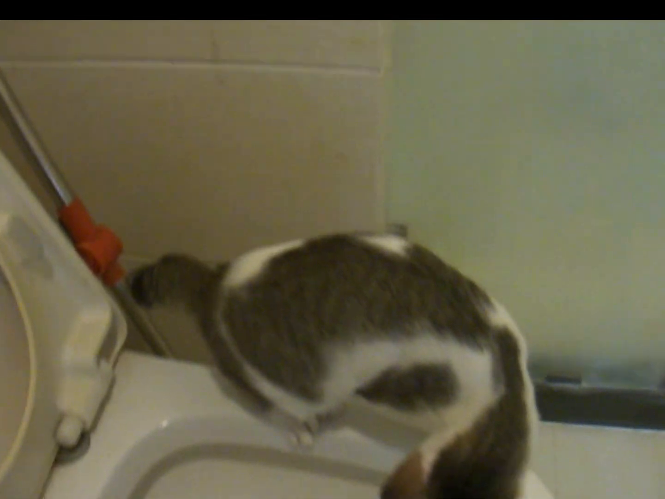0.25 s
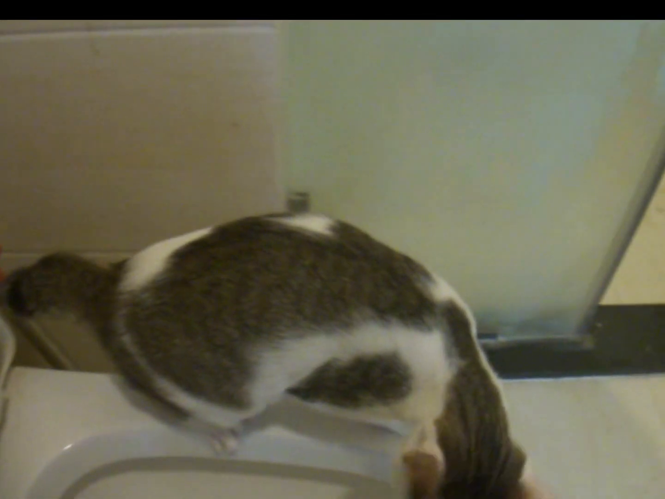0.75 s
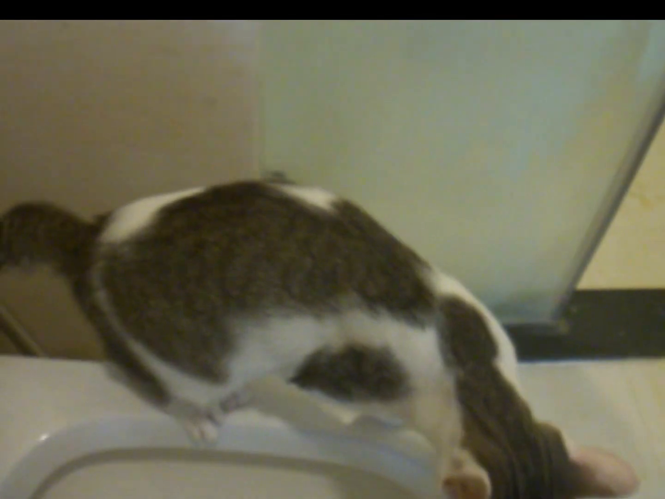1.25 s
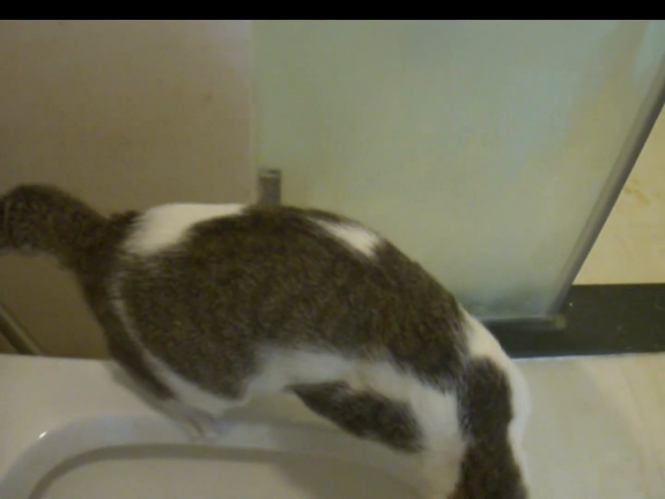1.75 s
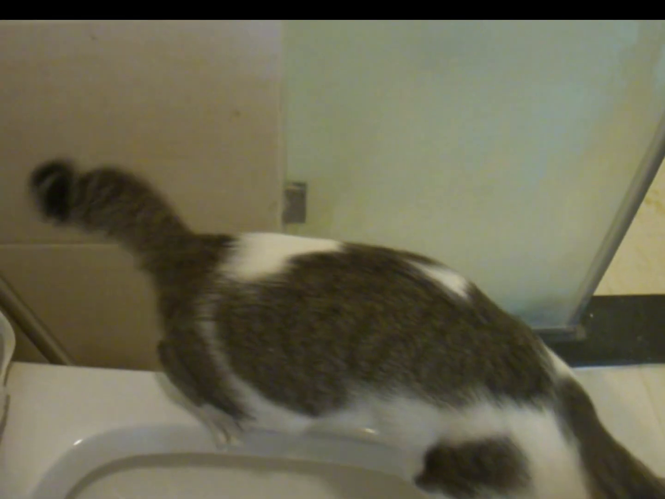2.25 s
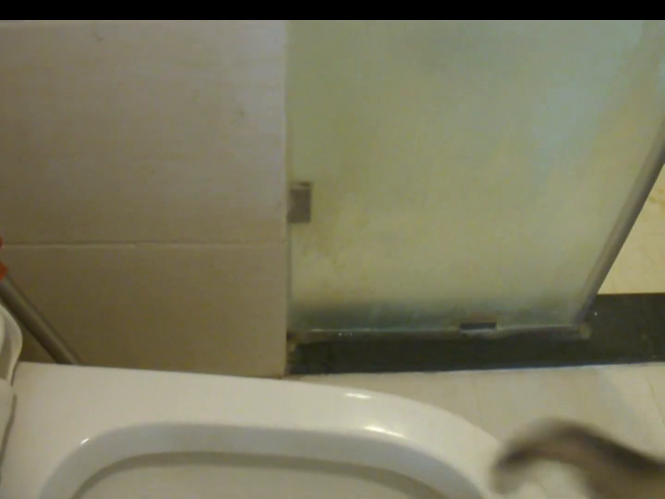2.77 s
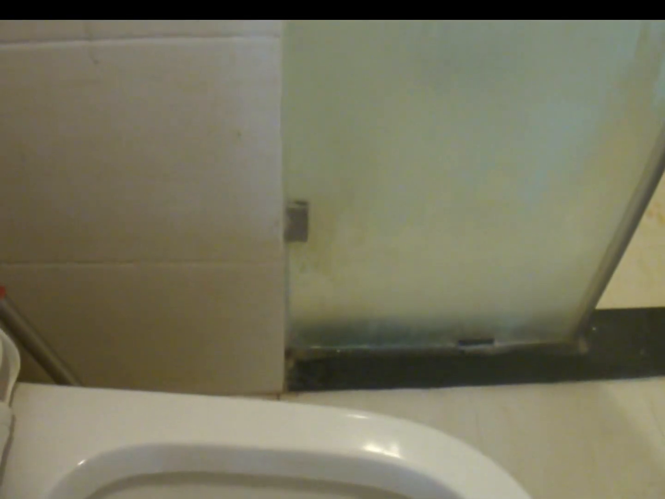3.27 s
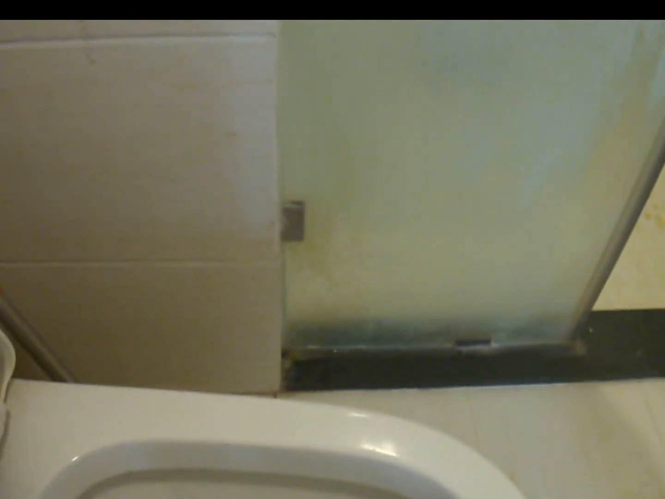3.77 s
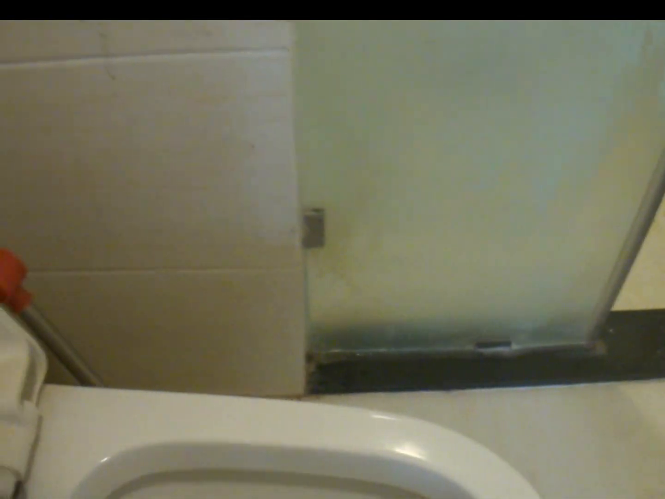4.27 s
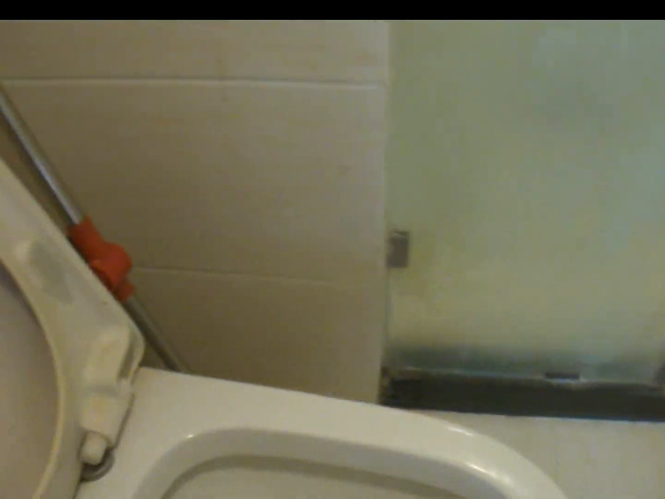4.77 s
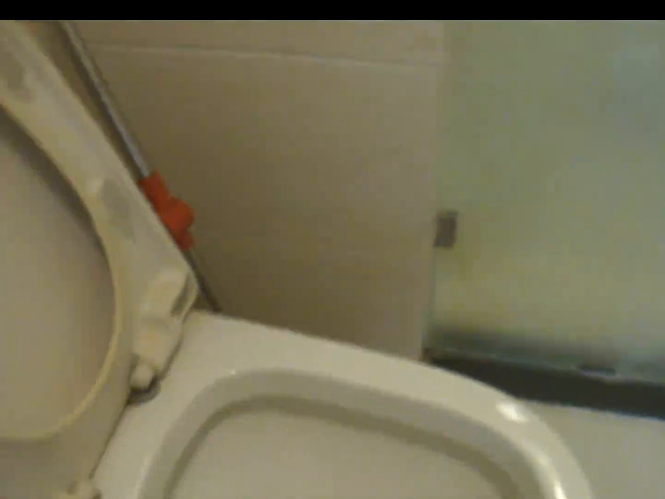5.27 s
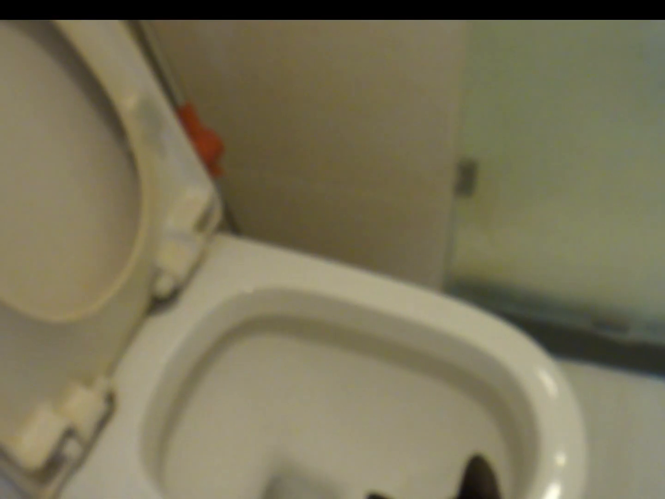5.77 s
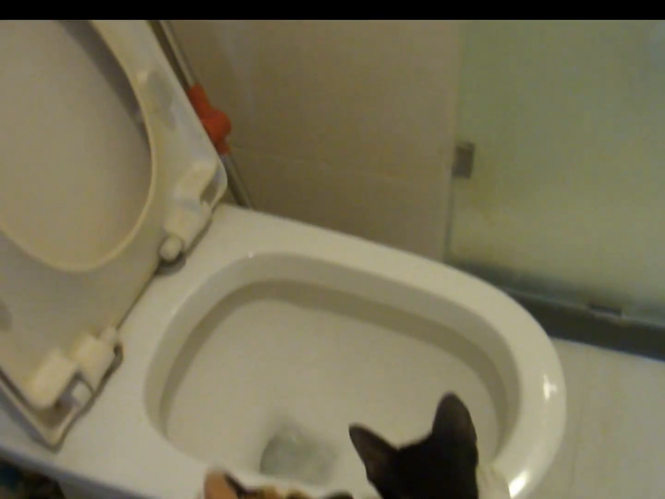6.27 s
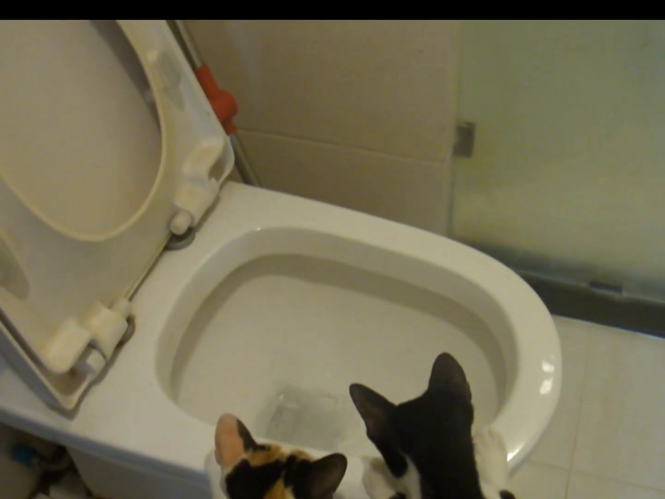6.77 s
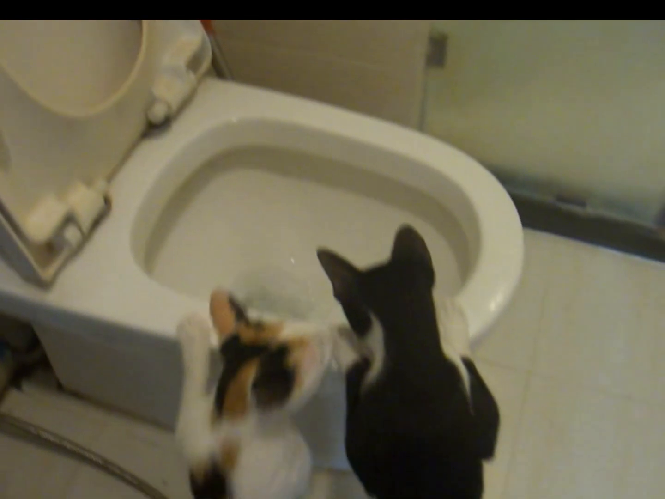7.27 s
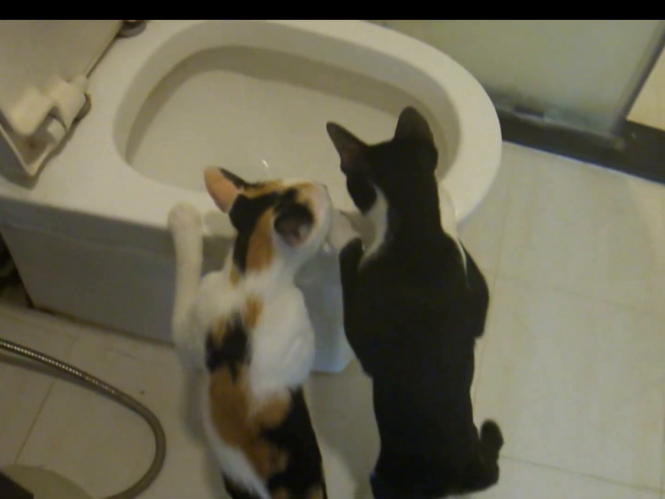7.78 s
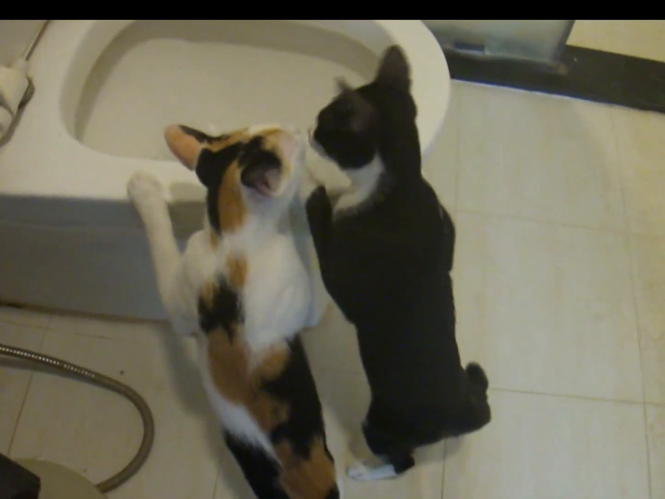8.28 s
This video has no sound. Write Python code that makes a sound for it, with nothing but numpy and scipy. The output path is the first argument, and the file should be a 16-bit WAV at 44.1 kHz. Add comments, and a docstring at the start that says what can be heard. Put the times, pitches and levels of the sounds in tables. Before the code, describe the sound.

Quiet room air with faint puffs of hiss, then a hard button clack and softer hollow knocks start a toilet flush. A frothy splashing surge calms to individual bubbles, spray ticks and throaty gurgles before a second, longer torrent roars and swallows. The rush collapses into thin valve hiss, nearly silent, before a faint tap on porcelain and a ringing pipe stream begin refilling the tank. Close small microphone, bright short tiled echo, little deep bass.

```python
"""Toilet flush in a small tiled bathroom

The button clacks, the valve knocks open and water churns into the bowl: ringing parts over shaped noise and bubbles.
Swarms of damped sines chirp and gulp, the trap swallows with a ringing throat, and the rush dies to a thin hiss.
A cat's paw taps the rim, and the cistern starts to refill: noise rung by the resonances of its pipe."""
import sys
import numpy as np
from scipy import signal
from scipy.fft import rfft, irfft, next_fast_len
from scipy.io import wavfile
from scipy.ndimage import uniform_filter1d, map_coordinates

SR = 44100
rng = np.random.default_rng(int(sys.argv[2]) if len(sys.argv) > 2 else 0)


def wrap_up_sound(samples):
    """Save the sound to the file named by the first command line argument, as 16-bit audio."""
    columns = np.atleast_2d(samples).T
    # keep every value between -1 and 1, then stretch to whole-number steps
    tamed = np.clip(columns, -1, 1)
    steps = np.round(tamed * 32767).astype(np.int16)
    wavfile.write(sys.argv[1], SR, steps)


N = 376173

# strength of the flow in the bowl, a washing surge and then the siphon's: t/s, level/dB
FLOW = [(1.45,-31),(1.65,-38),(2.1,-33),(2.22,-32),(2.36,-23.5),(2.51,-28.5),(2.62,-20),(2.8,-23),(2.92,-33),(3.12,-35),
        (4.3,-39),(4.65,-34),(4.81,-29.5),(4.95,-22),(5.92,-21.5),(6.0,-26.5),(6.12,-24.5),(6.21,-33),(6.44,-41),(6.6,-47.5)]
# spectrum of fine spray: f/Hz, relative level/dB
SPRAY = [(1000, -29), (3500, 10), (5000, 7), (6500, 13.5), (9000, 14), (10800, 18.5)]
CALM_DB = -28  # reference flow, between the two surges
JETS_OPEN_S, JETS_CLOSE_S = 1.455, 6.14  # the rim jets


def amp(db):
    """Decibels to gain."""
    return 10 ** (np.asarray(db) / 20)


def unit(x):
    """Scale to rms 1."""
    return x / np.sqrt(np.mean(x ** 2) + 1e-20)


def along(points, hz):
    """Read (Hz, value) points on a log frequency axis."""
    f, v = np.transpose(points)
    return np.interp(np.log(hz + 1), np.log(f + 1), v)


def curves(rows):
    """One value per sample for each column after the time."""
    s, *cols = np.transpose(rows)
    return [np.interp(np.arange(N) / SR, s, c) for c in cols]


def during(rows, fade):
    """1 while a curve lasts, fading to 0 outside it over fade seconds."""
    t = np.arange(N) / SR
    return np.clip(1 + np.minimum(t - rows[0][0], rows[-1][0] - t) / fade, 0, 1)


def wobble(rate):
    """A smooth random curve, rate knots a second."""
    return map_coordinates(rng.standard_normal(N // 20), [np.arange(N) * rate / SR], mode="wrap")


def filtered(x, response):
    """x times a complex response of frequency."""
    m = next_fast_len(len(x) + SR // 4)
    return irfft(rfft(x, m) * response(np.fft.rfftfreq(m, 1 / SR)), m)[:len(x)]


def noise(spectrum):
    """Coloured noise of rms 1."""
    return unit(filtered(rng.standard_normal(N), lambda hz: amp(along(spectrum, hz))))


def resonate(x, modes):
    """x through a body's resonances, each a band-pass: (centre Hz, width Hz, dB)."""
    def response(f):
        return sum(amp(db) * 1j * f * w / (c * c - f * f + 1j * f * w) for c, w, db in modes)
    return filtered(x, response)


def add(track, s, db, sound):
    """Put a sound into the track at time s with its peak at db."""
    part = track[round(s * SR):][:len(sound)]
    part += amp(db) * sound[:len(part)] / np.abs(sound).max()


def bubbles(rate, pitch_hz, spread, cycles, rise, size_db):
    """A swarm of damped bubbles of rms 1, each rising by its share of pitch as it nears the surface."""
    count = int(rate * N / SR)
    draws = np.random.default_rng(rng.integers(2 ** 31)).uniform(.001, .999, (count, 4))
    when, size, z, life = draws.T
    start = (when * N).astype(int)
    detune = np.clip(np.log(z / (1 - z)) / 2, -2, 2)  # bell-shaped scatter
    hz = np.broadcast_to(pitch_hz, N)[start] * np.exp(spread * detune)
    life = (cycles * (life + .5) / hz)[:, None]
    t = np.arange(int(2 * np.median(life) * SR)) / SR
    u = t / life
    swell = (1 - np.exp(-10 * u)) * np.exp(-np.pi * u)
    wave = swell * np.sin(2 * np.pi * hz[:, None] * t * (1 + rise * np.minimum(u, 2) / 2))
    wave *= amp(size_db * np.minimum(-np.log(size), np.pi))[:, None]
    places = start[:, None] + np.arange(len(t))
    return unit(np.bincount(places.ravel(), wave.ravel(), N)[:N])  # sums overlapping bubbles


def rough_rings(rows, attack, rise, rough):
    """Short rough rings, one pitch to a row, with noise shaking the phase and the pitch gliding up."""
    out, t = np.zeros(N), np.arange(SR // 3) / SR
    for s, db, hz, t60 in rows:
        shake = unit(uniform_filter1d(rng.standard_normal(len(t)), int(2 * SR / hz)))
        phase = 2 * np.pi * hz * t * (1 + rise * t) + rough * shake
        add(out, s, db, (1 - np.exp(-t / attack)) * amp(-60 * t / t60) * np.sin(phase))
    return out


def blows(rows, body, attack, crack_db, crack_t60):
    """Each plastic contact cracks and rings the cistern's loose parts, whose rattle blurs the ring."""
    # spectrum of the crack: f/Hz, relative level/dB
    crack_spectrum = [(50,-35),(160,11.5),(800,18.5),(2800,4),(5000,-4.5),(11000,-46)]
    out, t, crack = np.zeros(N), np.arange(SR // 3) / SR, noise(crack_spectrum)
    for s, db in rows:
        # random phase drift widens every partial
        drift = np.cumsum(rng.standard_normal((len(body), len(t))), axis=1) * np.sqrt(70 / SR)
        ring = np.zeros(len(t))
        for (hz, level, t60), blur in zip(body, drift):
            ring += amp(level - 60 * t / t60) * np.sin(2 * np.pi * hz * t + blur)
        snap = amp(crack_db - 60 * t / crack_t60) * crack[round(s * SR):][:len(t)]
        add(out, s, db, (ring / np.abs(ring).max() + snap) * (1 - np.exp(-t / attack)))
    return out


def room_air():
    """Steady air noise of the room, strongest in the bass."""
    # spectrum: f/Hz, relative level/dB
    air_spectrum = [(30,0.5),(70,-14),(430,-3),(1600,-3),(2600,-9),(6200,-19),(11000,-17.5)]
    return amp(-48.0) * noise(air_spectrum)


def hiss_puffs(attack_share=0.82):
    """Brief puffs of fine hiss, two of them before the water starts; shorter ones start more sharply."""
    # puffs of fine hiss: t/s, peak level/dB, length/s
    puffs = [(0.047,-31,0.1),(0.792,-28,0.053),(2.123,-10.5,0.017),(2.2842,-7,0.0039),(2.525,-11.5,0.12),(3.93,-2.5,0.008),(3.953,-14,0.066),(4.352,-14,0.0063)]
    out, t, hiss = np.zeros(N), np.arange(SR // 2) / SR, noise(SPRAY)
    for s, db, length in puffs:
        envelope = (1 - np.exp(-t / (attack_share * length))) * np.exp(-2 * t / length)
        add(out, s, db, hiss[round(s * SR):][:len(t)] * envelope)
    return out


def button_clacks():
    """The pressed button makes contact, ringing its parts with a sharp onset."""
    # contacts: t/s, peak level/dB
    contacts = [(.679,-26),(.709,-8),(.7195,-17.5)]
    # ringing parts: f/Hz, relative level/dB, t60/s
    button_parts = [(179,-20,0.54),(565,-5,0.13),(701,-3.5,0.42),(785,0.5,0.17),(873,0,0.11),(1746,7,0.037),(2040,-4,0.068),(2890,-2,0.031)]
    return blows(contacts, button_parts, attack=0.00013, crack_db=-22.5, crack_t60=0.58)


def valve_knocks():
    """The valve knocks open, ringing its parts with a softer onset than the button's."""
    # knocks: t/s, peak level/dB
    hits = [(1.31,-23.5),(1.517,-11.5),(1.556,-14.5),(1.595,-20.5)]
    # ringing parts: f/Hz, relative level/dB, t60/s
    valve_parts = [(550.6,11,0.18),(850,-3.5,0.18),(1040,-1.5,.1),(1248,-4,0.25),(1370,-0.5,0.09),(3650,-10,0.099)]
    return blows(hits, valve_parts, attack=0.0013, crack_db=-17.5, crack_t60=0.39)


def slugs():
    """Slugs of water heave in the trap and pipes as low, rough, rising rings."""
    # slugs: t/s, relative level/dB, starting f/Hz, t60/s
    heaves = [(1.422,-23,401,0.28),(2.027,-16.5,305,0.045),(2.141,-7,666,0.037),(2.345,-14.5,330,0.087),(3.363,-21.5,289.8,0.26),(3.366,-13.5,580,0.038),(3.89,-25.5,174,0.13),(3.895,-25.5,101,0.31),(4.918,-11,333,0.074),(5.147,-17.5,261,0.064),(5.175,-14.5,456,0.1),(5.44,-16.5,276,0.04),(8.145,-28.5,370.4,0.57)]
    return amp(-8.0) * rough_rings(heaves, attack=0.0033, rise=0.355, rough=0.3)


def boil(x, count=7):
    """Clouds of like-sized bubbles come and go: every band swells and sinks on its own."""
    depth_db, knots_per_s = 2.6, 38
    m = next_fast_len(N)
    spectrum = rfft(x, m)
    band = np.searchsorted(np.geomspace(450, 5000, count), np.fft.rfftfreq(m, 1 / SR))
    out = np.zeros(N)
    for k in range(count + 1):
        out += irfft(spectrum * (band == k), m)[:N] * amp(depth_db * wobble(knots_per_s))
    return unit(out)


def churn():
    """Water pours round the bowl: big bubbles gurgle, small ones splash, the finest fizz as spray."""
    # level of the low gurgle over the flow: t/s, level/dB
    depth = [(1.45,5),(2.36,3.5),(2.7,0.5),(3.6,-0.5),(3.9,7),(4.15,-10),(4.7,-6),(4.97,1.5),(5.1,-12),(5.2,3),(5.48,-6),(5.85,-15.5)]
    # spectra of gurgle and splash: f/Hz, relative level/dB
    gurgle_spectrum = [(50,-30),(120,-14.5),(260,9.5),(800,10.5),(1500,-2.5),(4000,-62)]
    splash_spectrum = [(150,-57),(800,6),(1300,10),(1650,-0.5),(3200,3.5),(4500,-14.5),(8000,-50)]
    fade_s, breakup_s = 0.36, 0.44  # the jets' fade; time until their smooth sheet breaks up
    spray_calm_db, spray_grows = -40.5, 1  # spray at calm flow; its dB per dB of flow

    (flow_db,), (bass_db,) = curves(FLOW), curves(depth)
    gurgle_db, splash_db = flow_db + bass_db, flow_db - 3
    spray_db = spray_calm_db + spray_grows * (flow_db - CALM_DB)
    t = np.arange(N) / SR
    jets = (t > JETS_OPEN_S) * np.clip(1 + (JETS_CLOSE_S - t) / fade_s, 0, 1)
    # in a full torrent single clusters merge into an even roar
    sparse = jets * np.clip((t - JETS_OPEN_S) / breakup_s, 0, 1) * np.clip(amp(-27 - splash_db), 0, 1)
    surge = np.clip(wobble(28), -1.3, 1.3) * sparse  # the stream breaks up unevenly
    clumps = amp(6.2 * np.minimum(wobble(55), 1.3) * sparse ** 2)  # bubbles are born in clusters

    deep = bubbles(rate=170, pitch_hz=389.0, spread=0.357, cycles=9.5, rise=0.2, size_db=8.5)
    gurgle = amp(-11.0) * boil(noise(gurgle_spectrum)) + amp(-19.5) * deep
    plinks = bubbles(rate=1000, pitch_hz=2135, spread=0.326, cycles=16.8, rise=0.12, size_db=6.5)
    splash = amp(-2.5) * boil(noise(splash_spectrum)) + amp(-4.5) * plinks * clumps
    fizz = bubbles(rate=2200, pitch_hz=4650, spread=0.243, cycles=16, rise=0, size_db=5)
    crackle = amp(2.8 * wobble(260) * sparse)
    spray = (amp(6.5) * noise(SPRAY) * crackle + amp(-1.0) * fizz * clumps) * jets
    # single small bubbles that pop on the surface, heard when the flow is calm
    plips = bubbles(rate=60, pitch_hz=2500, spread=0.42, cycles=18, rise=0.15, size_db=4)

    water = amp(gurgle_db + 3.24 * surge) * gurgle
    water += amp(splash_db + 2.4 * surge) * splash
    water += amp(spray_db + 2 * surge) * spray
    water += amp(-43) * plips * sparse
    return water * during(FLOW, fade=0.0059)


def squirt(attack=0.011):
    """The first water drives air out of the rim holes, which whistle briefly as resonated noise."""
    # rim hole resonances: f/Hz, width/Hz, relative level/dB
    rim_holes = [(2040,78,-2),(4000,100,-7),(4600,180,-8)]
    level_db, life_s = -36, 0.15
    t = np.maximum(np.arange(N) / SR - JETS_OPEN_S + attack, 0)
    whistle = unit(resonate(rng.standard_normal(N), rim_holes))
    return amp(level_db) * whistle * (1 - np.exp(-t / attack)) * np.exp(-t / life_s)


def spatter(scatter_db=6):
    """While the jets run, stray drops tick on the porcelain at random as decaying specks of hiss."""
    drops_per_s, typical_db, t60_s = 41, -22.5, 0.032
    out, t, hiss = np.zeros(N), np.arange(SR // 30) / SR, noise(SPRAY)
    span = JETS_CLOSE_S - JETS_OPEN_S
    drops = np.random.default_rng(rng.integers(2 ** 31)).random((int(drops_per_s * span), 2))
    for when, size in drops:
        s = JETS_OPEN_S + when * span
        tick = hiss[round(s * SR):][:len(t)] * amp(-60 * t / t60_s)
        add(out, s, typical_db + scatter_db * (2 * size - 1), tick)
    return out


def trickles():
    """A trickle strings bubbles on one warbling note: each swells, rises a little and gives way to the next."""
    # trickles: t/s, length/s, rms level/dB, f/Hz
    runs = [(1.66,0.45,-43,235.8),(2.159,0.06,-33,1710),(3.16,0.12,-38,1178),(4.119,0.076,-39,1770),(4.37,0.042,-39,1206),(4.458,0.42,-33.5,1185),(4.715,0.094,-33,2100)]
    bubbles_per_s, rise_share, scatter_db = 21.5, .12, 3
    out = np.zeros(N)
    for s, length, db, hz in runs:
        t = np.arange(int(length * SR)) / SR
        beat = t * bubbles_per_s
        pitch, size = rng.standard_normal((2, int(beat[-1]) + 1))[:, beat.astype(int)]
        bend = rise_share * (beat % 1 - .5 + pitch / np.pi)
        swell = amp(scatter_db * size) * np.sin(np.pi * (beat % 1)) ** 3
        note = swell * np.sin(2 * np.pi * np.cumsum(hz * (1 + bend)) / SR)
        ending = np.minimum(2 * (beat[-1] - beat), 1)
        out[round(s * SR):][:len(t)] += amp(db) * unit(note * ending)
    return out


def chirps(life=0.0095, rise_hz=1100, skew=0.8, burst_db=-20, splash_db=-9):
    """A bubble opening at the surface sweeps up; its film bursts in a tick of spray and a pitched splash."""
    # small bubbles: t/s, peak level/dB, centre f/Hz
    pops = [(1.823,-18.5,2740),(1.875,-20.5,2750),(1.9897,-12.5,2280),(2.0652,-14,2364),(2.102,-11,2650),(2.4173,-7,2525),
            (3.3329,-15.5,2780),(3.363,-23,2550),(3.426,-21,1780),(3.5021,-12.5,2530),(3.6642,-12,2620),(4.079,-19.5,3450),(4.1179,-14,1780),
            (4.31,-13,3600),(4.3953,-16,4600),(4.432,-16,5150),(4.6765,-16.5,3130),(4.681,-15.5,5430),(4.7025,-15.5,2430)]
    out, u, spray = np.zeros(N), np.linspace(0, 1, int(life * SR)), noise(SPRAY)
    for s, db, hz in pops:
        phase = 2 * np.pi * np.cumsum(hz + rise_hz * (u - .5)) / SR
        splash = unit(resonate(rng.standard_normal(len(u)), [(hz, hz / 2, 0)]))
        film = amp(splash_db) * splash + amp(burst_db) * spray[round(s * SR):][:len(u)]
        add(out, s, db, np.sin(np.pi * u ** skew) ** 2 * (np.sin(phase) + film))
    return out


def slaps(spread=0.251, cycles=11, count=40):
    """A sheet of water hits the porcelain and breaks into a burst of like-sized bubbles."""
    # slaps: t/s, peak level/dB, centre f/Hz
    sheets = [(2.242,-19.5,2700),(2.32,-9.5,1430),(2.624,-15,2700),(2.662,-13,2570),(2.745,-8.5,2610),(2.8,-10.5,2500),(2.827,-12.5,2650),(2.893,-7,2320),(2.994,-11,2700),(3.007,-12,2060),
              (3.558,-19.5,2600),(3.604,-11,2220),(3.871,-15.5,1990),(4.31,-17,4530),(4.415,-18,3100),(4.822,-9.5,2650),(4.936,-7,1870),(5.011,-7.5,1800),(5.165,-11.5,2520),(5.273,-13.5,2020),(5.797,-17,2540),(5.834,-11.5,2150),(5.856,-17,2120),(5.905,-19,1680)]
    delay_s = 0.008  # typical wait until a slap's bubbles are born
    out, t = np.zeros(N), np.arange(SR // 10) / SR
    for s, db, centre_hz in sheets:
        across, down, pitch, size = rng.standard_normal((4, count, 1))
        born = delay_s * np.hypot(across, down)  # later the farther from the point of impact
        turns = centre_hz * np.exp(spread * pitch) * np.maximum(t - born, 0)
        u = np.pi * turns / cycles
        burst = size * (np.exp(-u) - np.exp(-10 * u)) * np.sin(2 * np.pi * turns)
        add(out, s, db, np.sum(burst, axis=0))
    return out


def throat():
    """Bubbles ring the air cavity in the trap; its pitch follows the water level."""
    # cavity: t/s, f/Hz, level over the flow/dB
    cavity = [(2.55,977,-3),(2.85,1090,-18),(3.16,1090,4),(3.36,762,0.5),(3.7,832,2.5),(4.1,1164,6),(4.75,1160,-4),(4.82,987,1),(5.4,861,-2),(5.78,1274,-2),(6.3,960,-9)]
    (pitch_hz, over_db), (flow_db,) = curves(cavity), curves(FLOW)
    db = flow_db + over_db
    turbulence = np.clip(amp(db + 30.5), 0, 1)  # a strong flow turns the clear ring to froth
    ring = bubbles(rate=120, pitch_hz=pitch_hz, spread=0.054, cycles=15, rise=0.018, size_db=3.5)
    froth = bubbles(rate=300, pitch_hz=pitch_hz, spread=0.246, cycles=13.4, rise=0.384, size_db=6.0)
    mix = amp(-8.5) * ring * (1 - turbulence / 2) + amp(-5.5) * froth * turbulence
    return amp(db) * mix * during(cavity, fade=0.18)


def gulps():
    """Large air pockets are gulped through the trap; a stronger flow damps their ring sooner."""
    # air pockets: t/s, peak level/dB, starting f/Hz
    swallows = [(2.557,-16.5,964),(3.092,-18.5,996),(3.152,-21,1120),(3.226,-22.5,826),(3.363,-16,764),(3.424,-23,798),(4.338,-27,784),
                (4.512,-17,1080),(4.786,-11,972),(4.833,-6,984),(4.862,-13.5,880),(4.935,-14,950),(5.174,-14.5,965),(5.373,-10,1018),(5.485,-13.5,980),(5.77,-10,1280)]
    calm_t60_s, damping = 0.033, 0.68  # ring at calm flow; dB of ring time lost per dB of flow
    flow_db, = curves(FLOW)
    t60 = calm_t60_s * amp(damping * (CALM_DB - flow_db))
    rows = [(s, db, hz, t60[round(s * SR)]) for s, db, hz in swallows]
    return rough_rings(rows, attack=0.00063, rise=0.34, rough=0.12)


def inlet_hiss():
    """The inlet valve hisses thinly: coloured noise under a slow level curve."""
    # valve: t/s, level/dB
    inlet_levels = [(6.2,-43.5),(7.0,-43),(7.28,-45),(7.55,-65),(8.0,-55),(8.3,-45.5)]
    # spectrum: f/Hz, relative level/dB
    hiss_spectrum = [(600,-22),(2200,2),(4500,0),(6500,-3),(9400,-2),(10300,4.5),(11000,3)]
    (hiss_db,) = curves(inlet_levels)
    return amp(hiss_db) * noise(hiss_spectrum) * during(inlet_levels, fade=1.0)


def inlet_rings():
    """As the cistern starts to refill, its inlet gives short rough rings: squeaks, then first bursts of water."""
    # rings of the inlet: t/s, peak level/dB, starting f/Hz, t60/s
    first_rings = [(7.225,-47,4530,0.21),(7.68,-44,2830,0.18),(7.78,-43,2135,0.25),(8.07,-43,1960,0.3)]
    return rough_rings(first_rings, attack=0.011, rise=0.116, rough=0.78)


def paw(t60=0.012, pitch_hz=700, width_hz=300):
    """A cat's paw taps the porcelain rim softly: a short noise burst through one broad resonance."""
    out, t = np.zeros(N), np.arange(SR // 5) / SR
    burst = rng.standard_normal(len(t)) * amp(-60 * t / t60)
    add(out, 7.517, -32, resonate(burst, [(pitch_hz, width_hz, 0)]))
    return out


def refill():
    """The stream into the cistern swells and wavers, ringing the pipe and tank."""
    # running water: t/s, level/dB
    fill_levels = [(7.7,-73),(7.8,-54.5),(8.14,-43.5),(8.2,-36),(8.53,-32.5)]
    # pipe and tank resonances: f/Hz, width/Hz, relative level/dB
    pipe_modes = [(500,62,-4),(906,23,8),(2014,26,8),(2130,150,1),(3020,36,0)]
    # stream spectrum: f/Hz, relative level/dB
    stream_spectrum = [(60,-26),(200,-19),(370,-1),(1200,0),(1750,-6.5),(2200,5),(2700,-8.5),(5000,-32)]
    (fill_db,) = curves(fill_levels)
    ringing = unit(resonate(rng.standard_normal(N), pipe_modes))
    stream = amp(-7.5) * ringing + amp(-2.5) * noise(stream_spectrum)
    return amp(fill_db + 0.9 * wobble(25)) * stream * during(fill_levels, fade=0.085)


def porcelain(water):
    """The porcelain hollow rings along with the sounds in the bowl."""
    # bowl resonances: f/Hz, width/Hz, relative level/dB
    bowl_modes = [(163,7.7,-1),(252.4,15.7,1),(315,15.5,5),(450.6,39,-1.5),(617,46,2),(1397,11,-13),(2376,44,-4)]
    return water + resonate(water, bowl_modes)


def bathroom(x, walls_db, tail_db):
    """Close tiled walls throw back a few copies, then a ringing tail that dies sooner in the treble."""
    # decay of the tiled room: f/Hz, t60/s
    tile_decay = [(150, 1), (400, 1), (1000, 0.73), (3000, 0.59), (10000, 0.19)]
    hz, t, z = signal.stft(rng.standard_normal(SR), SR, nperseg=256)
    tail = signal.istft(z * amp(-60 * t / along(tile_decay, hz)[:, None]), SR, nperseg=256)[1]
    answer = amp(tail_db) * np.pad(tail / np.linalg.norm(tail), (SR // 200, 0))
    delays = rng.uniform(0.0018, .025, size=8)  # seconds
    answer[(delays * SR).astype(int)] += amp(walls_db - 170 * delays) * rng.choice([-1, 1], size=8)
    return x + signal.fftconvolve(x, answer)[:N]


def scene():
    """Mechanism and water in the room, over its steady air noise."""
    mechanism = button_clacks() + valve_knocks()
    bowl = hiss_puffs() + slugs() + amp(-1) * churn() + trickles() + chirps() + slaps() + throat() + gulps()
    rim = squirt() + spatter() + paw()
    cistern = inlet_hiss() + inlet_rings() + refill()
    sources = mechanism + porcelain(bowl) + rim + cistern
    return bathroom(sources, walls_db=-17.5, tail_db=-7.5) + room_air()


def record(dry, low_hz=85, top_hz=11070):
    """A small microphone loses the deep bass, and nothing is kept above its band limit."""
    return filtered(dry, lambda hz: (1j * hz / (low_hz + 1j * hz)) ** 2 * (hz < top_hz))


dry = scene()
out = record(dry)
wrap_up_sound(out)
```